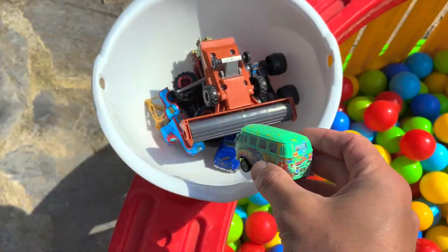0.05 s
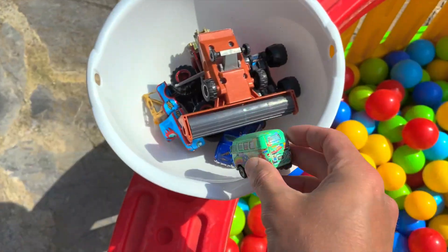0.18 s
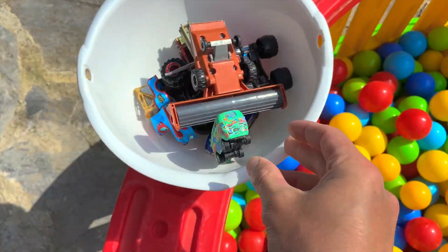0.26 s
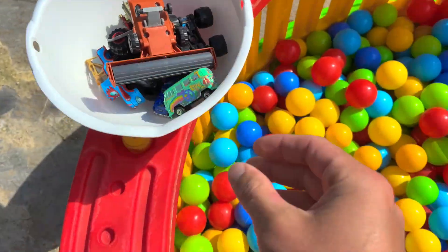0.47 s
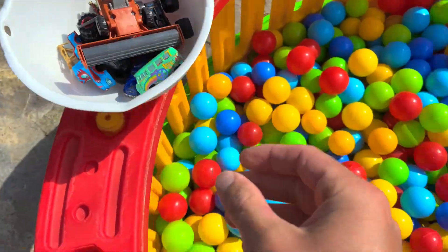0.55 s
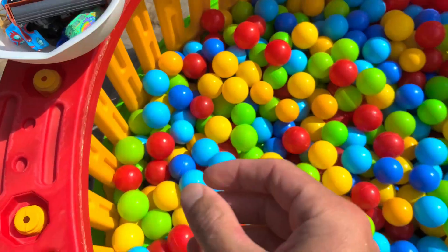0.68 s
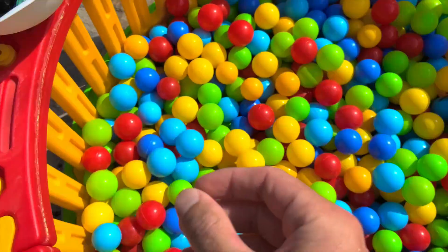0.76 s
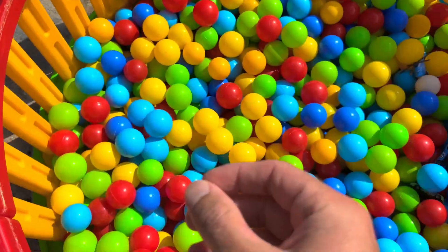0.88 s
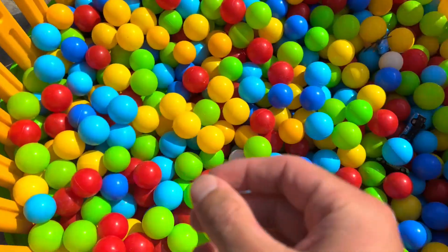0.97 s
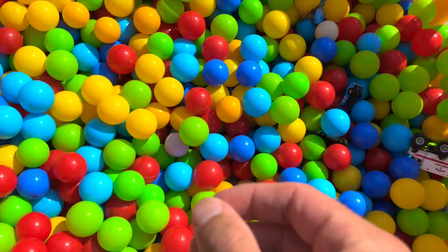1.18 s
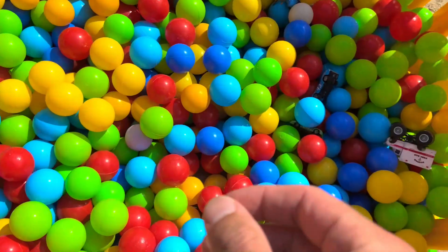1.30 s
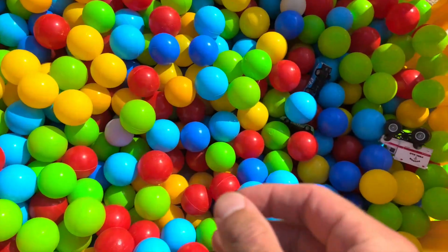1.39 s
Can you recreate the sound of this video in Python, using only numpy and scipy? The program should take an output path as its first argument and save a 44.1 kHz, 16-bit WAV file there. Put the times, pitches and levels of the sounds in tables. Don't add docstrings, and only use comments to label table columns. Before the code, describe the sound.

A die-cast toy van drops into a plastic bowl of toy cars: light contact at 0.15 seconds, then loud bright clacks and short hollow thuds at 0.21-0.28. The heap clatters again, softer, around 0.48-0.54, with duller knocks at 0.66-0.8 and a faint rising scrape near 0.95. Close and dry outdoors; wind rumble swells from 0.4 with low bumps, over faint engine drone and hiss.

```python
import sys
import numpy as np
from scipy import signal
from scipy.fft import rfft, irfft
from scipy.io import wavfile
from scipy.ndimage import uniform_filter1d

SR = 44100
rng = np.random.default_rng(int(sys.argv[2]) if len(sys.argv) > 2 else 0)


def transcribe(signal):
    frames = np.atleast_2d(signal).T
    limited = np.clip(frames, -1, 1)
    pcm = np.round(limited * 32767).astype(np.int16)
    wavfile.write(sys.argv[1], SR, pcm)


def nominal_scale(level):
    x = np.asarray(level, float) / 20
    return 10 ** x


N = 63945

# t/s, level/dB
WIND_LEVEL = [(0.0, -54), (0.222, -48), (0.254, -49), (0.37, -44), (0.42, -34), (0.596, -28.5),
              (0.646, -29), (0.69, -33), (0.84, -39), (0.94, -36.5), (1.02, -36), (1.066, -32),
              (1.138, -33.5), (1.17, -30), (1.226, -33), (1.4, -31.5), (1.42, -35), (1.45, -34)]
# f/Hz, level/dB
WIND_SPECTRUM = [(22, -44), (40, -14), (60, -10.5), (100, -13), (140, -18.5), (220, -23.5), (500, -33)]
# t/s, level/dB, f/Hz
GUST_BUMPS = [
    (0.556, -29, 112),
    (.585, -54, 75),
    (1.152, -27, 128.5),
    (1.38, -26, 97),
]
# t/s, f/Hz, level/dB
ENGINE_DRONE = [(0.0, 65.7, -42), (0.378, 76.87, -56), (0.428, 77.7, -34.5), (0.464, 70.06, -42),
                (0.714, 71.35, -28), (0.794, 69.07, -53), (0.996, 69.07, -40), (1.055, 75.7, -33),
                (1.214, 82.9, -35), (1.312, 65.7, -38), (1.38, 81.2, -32), (1.45, 88, -48)]
# f/Hz, level/dB
HISS_SPECTRUM = [(120, -24), (200, -8.5), (800, -9), (2700, -25), (7500, -40.5), (9500, -79.5),
                 (12500, -42.5), (15000, -69.5)]
# t/s, level/dB
HISS_SWELL = [
    (0, -9),
    (.4, -9.5),
    (.85, -6.5),
    (1.1, -7),
    (1.45, -4.5),
]
# t/s, level/dB
SHUFFLE_LEVEL = [(0.0, -76), (.14, -58.5), (.2, -35), (0.26, -44.5), (.32, -44.5), (0.4, -56), (.47, -58),
                 (0.49, -54), (.55, -44), (.62, -50), (.7, -37.5), (.76, -56.5), (.9, -59.5), (.97, -39.5),
                 (1.03, -55.5), (1.45, -58)]
# f/Hz, level/dB, t60/s
CAR_MODES = [(1290, -6, .018), (1500, -7, .015), (1900, -3, .018), (2290, -1, .02), (2800, -6, .01),
             (3400, -6, .01), (3900, -5, .008), (4600, -5, .006), (5400, -4, .006), (6440, -4, .008),
             (7400, -6, .006), (8300, -9, .005), (11000, -8, .004), (12800, -8, .004)]
# t/s, level/dB, ring f/Hz, bright share/dB, chatter length/ms
LANDING_CLINKS = [(.141, -24.5, 2330, -10.5, 5.4), (.1465, -18.5, 1355, 1.5, 3),
                  (.163, -28, 2300, -12, 1.5), (.188, -29, 2420, 7, 4), (.210, -13.5, 2450, 22, 2.8),
                  (.2155, -8.5, 2360, -6, 3.4), (.236, -13, 1900, -12.5, 5), (.243, -16, 1890, -15.5, 7.2),
                  (.254, -6, 6250, 14, 2.5), (.2585, -8.5, 2430, -3, 5.3), (.271, -14, 1950, -9.5, 1),
                  (.281, -20, 1800, -14.5, 6.6), (.300, -22.5, 1310, -6, 4.4), (.312, -28.5, 2035, -5, 7),
                  (.337, -26.5, 2210, -26, 2.4), (.343, -30, 1950, -15.5, 6.8), (.383, -29, 1520, -19, 1.7)]
# t/s, level/dB, ring f/Hz, bright share/dB, chatter length/ms
SETTLING_CLINKS = [(0.477, -10.5, 2340, 2.5, 4.8), (0.491, -10.5, 1523, -4, 3.8),
                   (0.496, -19, 2000, -14, 9.4), (0.502, -13.5, 2350, 5, 3.5),
                   (0.507, -14.5, 1780, -13.5, 3.3), (0.515, -16, 2260, -15.5, 4.3),
                   (0.527, -21.5, 1800, -18.5, 3.3), (0.54, -23.5, 1640, -12, 4.1),
                   (0.573, -30, 1540, -11.5, 5.3), (0.62, -35, 1460, -12, 6.9),
                   (0.6425, -21, 1650, -21.5, 3.3), (0.662, -18.5, 1360, -21.5, 4.7),
                   (0.681, -27, 2120, -26, 8.6), (0.698, -23, 1660, -15, 2.8), (0.704, -26, 1140, -14, 3.9),
                   (0.731, -34, 1380, -20, 2.9), (0.7915, -25.5, 2060, -21, 3.5),
                   (0.972, -26.5, 2000, -24, 1.4), (1.184, -35.5, 1250, -31, 6.2)]
# t/s, level/dB, f/Hz, t60/ms
PART_KNOCKS = [(.146, -25.5, 1280, 41), (0.1462, -21.5, 2380, 16), (.148, -34, 3340, 17),
               (.1885, -39, 2350, 15), (0.956, -31, 440, 22), (.974, -24.5, 463, 21),
               (.5025, -20, 2210, 18), (0.5398, -26, 6650, 11), (.698, -26, 1670, 13),
               (.2165, -8.5, 2310, 21), (0.242, -20.5, 1265, 68), (.2445, -5, 1863, 16.7),
               (0.2553, -11, 3920, 17), (0.2548, -3.5, 5710, 16), (0.2578, -10, 1844, 29),
               (0.2543, -12, 2940, 18), (0.2714, -17, 1840, 21), (.282, -14.5, 1946, 26),
               (.4785, -11.5, 2277, 41), (.482, -15, 1240, 19.5), (.4915, -33, 1440, 19),
               (0.4907, -9, 3770, 9), (0.507, -14.5, 1784, 26), (0.5157, -16.5, 2335, 32),
               (.5285, -27, 1920, 13), (0.6437, -18.5, 1555, 12), (0.6635, -9.5, 1630, 11),
               (.666, -31.5, 2082, 150), (.682, -23, 1290, 15), (.705, -21, 1420, 15),
               (0.71, -23.5, 1120, 21), (.771, -36, 1170, 25), (0.7923, -21, 1660, 16),
               (.7935, -21.5, 695, 12.6), (0.911, -31, 990, 23), (.915, -35.5, 1870, 26),
               (.9335, -25.5, 1270, 25), (.9365, -24, 734, 20), (0.945, -40, 1140, 25),
               (.957, -32, 1245, 37), (0.965, -30.5, 1540, 36), (.972, -23, 1972, 21),
               (.972, -34, 1410, 13), (.977, -40, 760, 16), (.997, -43, 2460, 23), (1.048, -39, 1786, 25),
               (1.186, -36, 1244, 26)]
# t/s, level/dB, starting f/Hz
BOWL_BLOWS = [(0.1536, -19, 750), (0.167, -29, 456), (0.2134, -4, 872), (0.2361, -4, 898),
              (0.2465, -16, 610), (0.2572, -3.5, 855), (0.291, -23.5, 460), (0.303, -18.5, 535),
              (.313, -24, 455), (0.336, -30, 465), (0.385, -32, 493), (.479, -22.5, 830), (.487, -17, 510),
              (.498, -14.5, 717), (0.5116, -14, 485), (0.533, -22.5, 490), (0.551, -26, 350),
              (0.663, -21, 848), (0.684, -19, 707), (.7705, -27, 830), (.794, -31.5, 506),
              (0.975, -34.5, 680)]
# f/Hz, level/dB, t60/s
BOWL_MODES = [(156, 10, 0.066), (202, 7, 0.032), (254, -3, 0.074), (310, -5, 0.1)]
# t/s, level/dB, ring f/Hz
WALL_SLIDE = [
    (0.907, -76, 1014),
    (0.915, -55, 1030),
    (.935, -45.5, 1122),
    (.952, -47.5, 1244),
    (0.965, -35, 1410),
    (0.977, -47, 1822),
    (0.985, -50, 2177),
    (1.003, -47.5, 2410),
    (1.015, -60, 2360),
]
# f/Hz, phase the left port leads by/rad
PORT_PHASE = [(0, 0), (1300, .5), (2200, .9), (4200, 1.2), (6500, .4), (9150, 3.14), (12400, 5.4),
              (16000, 9.8)]

WIND_DB, HISS_DB = -9, -43
HISS_LAG = 18
SHUFFLE_PER_S, SHUFFLE_DB = 2500, -4.5
SCATTER_DB, DETUNE = 3, .05
TICKS_PER_S, CLINK_DB = 7000, -2
RING_DB, BODY_DB, CRACK_DB, GRIT_DB = -11, -5, -9.5, -12.5
RING_T60_S, GRIT_TOP_HZ = .012, 3280
KNOCK_RISE_S = 0.00083
SAG_HZ, SAG_S = 198, 0.0026
THUD_RISE_S, THUD_T60_S = 0.00066, 0.042
BOWL_DB, BOWL_RING_DB = -1, -24.5
SLIPS_PER_S, SLIDE_HISS_DB = 3500, -18
WIDE_DB, WIDE_TOP_HZ, LEAN = -23, 9000, 0.11
ECHO_DB, ECHO_T60_S, ECHO_TOP_HZ = -12, .06, 7150
MIC_TOP_HZ = 15100


def unit(x):
    return x / np.sqrt(np.mean(x ** 2))


def curve(table):
    return nominal_scale(np.interp(np.arange(N) / SR, *np.array(table).T))


def butter(x, order, hz, kind="low"):
    return signal.sosfilt(signal.butter(order, hz, kind, fs=SR, output="sos"), x)


def mode(x, hz, t60):
    r = np.exp(-np.log(1000) / (max(t60, .003) * SR))
    w = 2 * np.pi * hz / SR
    return signal.lfilter([0, r * np.sin(w)], [1, -2 * r * np.cos(w), r * r], x)


def colour(table):
    hz, db = np.array(table).T
    f = np.maximum(np.fft.rfftfreq(N, 1 / SR), 1)
    gain = nominal_scale(np.interp(np.log(f), np.log(hz), db, -90, -90))
    return unit(irfft(rfft(rng.standard_normal(N)) * gain, N))


def ticks(count, per_s, spread_db=6.0):
    chance, sign, size = rng.random((3, count))
    return (chance < per_s / SR) * np.sign(sign - .5) * nominal_scale(-spread_db * np.log(size + .03))


def wind():
    t = np.arange(N) / SR
    bumps = np.zeros(N)
    for s, db, hz in GUST_BUMPS:
        swell = np.sin(np.pi * np.clip((t - s) * hz / 1.59, 0, 1))
        bumps += nominal_scale(db) * swell * np.sin(2 * np.pi * hz * (t - s))
    rumble = np.array([colour(WIND_SPECTRUM), nominal_scale(-8.0) * colour(WIND_SPECTRUM)])
    return rumble * curve(WIND_LEVEL) * nominal_scale(WIND_DB) + bumps * np.array([[1], [.2]])


def drone():
    t = np.arange(N) / SR
    s, hz, db = np.array(ENGINE_DRONE).T
    tone = np.sqrt(2) * np.sin(2 * np.pi * np.cumsum(np.interp(t, s, hz)) / SR)
    return tone * nominal_scale(np.interp(t, s, db) - 7.5) * np.array([[1], [.2]])


def distant_hiss():
    air = colour(HISS_SPECTRUM)
    sided = np.array([np.roll(air, HISS_LAG), air])
    diffuse = np.array([colour(HISS_SPECTRUM), colour(HISS_SPECTRUM)])
    return (sided + nominal_scale(1.0) * diffuse) * nominal_scale(HISS_DB) * curve(HISS_SWELL)


def metal(x, bright_db, chance):
    out = 0
    for (hz, db, t60), (louder, sharper) in zip(CAR_MODES, chance):
        tilt = bright_db * np.clip(np.log2(hz / 2000) / 0.5, 0, 1)
        out = out + nominal_scale(db + SCATTER_DB * louder + tilt) * mode(x, hz * (1 + DETUNE * sharper), t60)
    return out


def shuffle():
    even = np.zeros((len(CAR_MODES), 2))
    patter = [unit(metal(ticks(N, SHUFFLE_PER_S, 1.1), -3.5, even)) for _ in range(2)]
    return np.array(patter) * curve(SHUFFLE_LEVEL) * nominal_scale(SHUFFLE_DB)


def clink(hz, bright_db, ms, size):
    t = np.arange(size) / SR
    tau = max(ms, .5) / 1000
    shape = np.sqrt(t / tau) * np.exp(-(t / tau) ** 1.27)
    x = ticks(size, TICKS_PER_S) * shape
    x[24] += .7
    x = butter(x, 2, np.clip(16000 * nominal_scale(bright_db * 0.7), 1500, 18000))
    hiss = rng.standard_normal(size) * shape
    crack = butter(hiss, 2, [3300, 12000], "band")
    grit = butter(hiss, 1, [650, GRIT_TOP_HZ], "band")
    body = metal(x, bright_db + 21.5, rng.standard_normal((len(CAR_MODES), 2)))
    ring = mode(x, hz, RING_T60_S * min(2000 / hz, 1))
    y = nominal_scale(RING_DB) * unit(ring) + nominal_scale(BODY_DB) * unit(body)
    y += nominal_scale(CRACK_DB + bright_db) * unit(crack) + nominal_scale(GRIT_DB) * unit(grit)
    return y / np.sqrt(uniform_filter1d(y ** 2, size=128).max())


def clinks(table):
    size = 4096
    out = np.zeros((2, N + size))
    for s, db, hz, bright_db, ms in table:
        i = int(s * SR)
        for side in range(2):
            out[side, i:i + size] += clink(hz, bright_db, ms, size) * nominal_scale(db + CLINK_DB) * .5
    return out[:, :N]


def knocks():
    t = np.arange(N) / SR
    out = np.zeros(N)
    for s, db, hz, ms in PART_KNOCKS:
        u = np.maximum(t - s, 0)
        envelope = (1 - np.exp(-(u / KNOCK_RISE_S) ** 2)) * nominal_scale(-60000 * u / max(ms, 4))
        out += nominal_scale(db) * envelope * np.sin(2 * np.pi * hz * u)
    return out


def bowl():
    t = np.arange(N) / SR
    thud = np.zeros(N)
    for s, db, hz in BOWL_BLOWS:
        u = np.maximum(t - s, 0)
        turns = SAG_HZ * u + (hz - SAG_HZ) * SAG_S * (1 - np.exp(-u / SAG_S))
        envelope = (1 - np.exp(-(u / THUD_RISE_S) ** 2)) * nominal_scale(-60 * u / THUD_T60_S)
        thud -= nominal_scale(db + BOWL_DB) * envelope * np.sin(2 * np.pi * turns)
    ring = sum(nominal_scale(db) * mode(thud, hz, t60) for hz, db, t60 in BOWL_MODES)
    return butter(thud + nominal_scale(BOWL_RING_DB) * 0.079 * ring, 3, 125, "high")


def slide():
    t = np.arange(N) / SR
    s, db, hz = np.array(WALL_SLIDE).T
    climb = np.sin(2 * np.pi * np.cumsum(np.interp(t, s, hz)) / SR)
    out = []
    for _ in range(2):
        slips = ticks(N, SLIPS_PER_S, 1.2)
        ring = np.convolve(slips, np.hanning(110), "same") * climb
        rub = butter(slips, 2, [380, 2200], "band")
        out.append(unit(ring) + nominal_scale(1.5) * unit(rub) + nominal_scale(SLIDE_HISS_DB) * unit(slips))
    return np.array(out) * nominal_scale(np.interp(t, s, db, -120, -120))


def echo(x):
    t = np.arange(8192) / SR
    tail = butter(rng.standard_normal((2, len(t))), 1, ECHO_TOP_HZ) * nominal_scale(-60 * t / ECHO_T60_S)
    tail /= np.sqrt((tail ** 2).sum(axis=1, keepdims=True))
    wet = signal.fftconvolve(x[None], tail, axes=1)[:, :N]
    return nominal_scale(ECHO_DB) * wet * np.array([[1], [.3]])


def scene():
    cars = shuffle() + clinks(LANDING_CLINKS) + clinks(SETTLING_CLINKS) + slide()
    cars = butter(cars, 2, 350, "high")
    near_mid = cars[0] + knocks() + bowl()
    near_side = nominal_scale(WIDE_DB) * butter(cars[1], 2, WIDE_TOP_HZ)
    near_side -= LEAN * butter(near_mid, 1, 1800)
    mid, side = np.array([near_mid, near_side]) + wind() + drone() + echo(near_mid)
    return np.array([mid + side, mid - side]) + distant_hiss()


def roll_off(x):
    return signal.sosfilt(signal.butter(12, 16480, fs=SR, output="sos"), x)


def record(dry):
    hz, rad = np.array(PORT_PHASE).T
    turn = np.exp(.5j * np.interp(np.fft.rfftfreq(N, 1 / SR), hz, rad))
    x = irfft(rfft(dry) * np.array([turn, turn.conj()]), N)
    rounded = 1.1 * np.tanh(x / 1.1)
    return roll_off(butter(rounded, 8, MIC_TOP_HZ))


dry = scene()
out = record(dry)
transcribe(out)
```